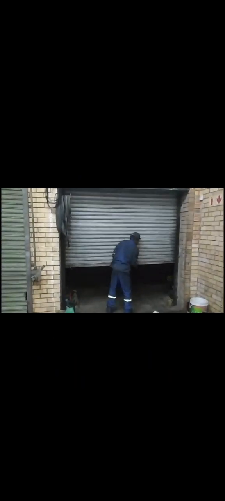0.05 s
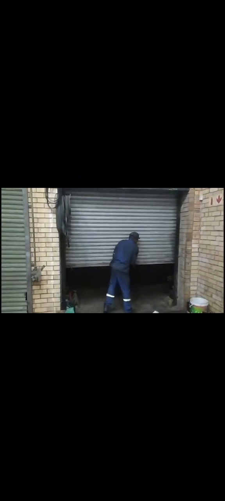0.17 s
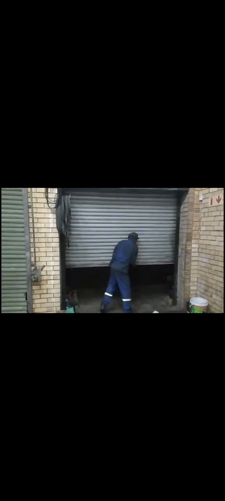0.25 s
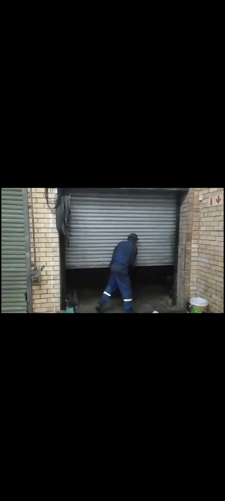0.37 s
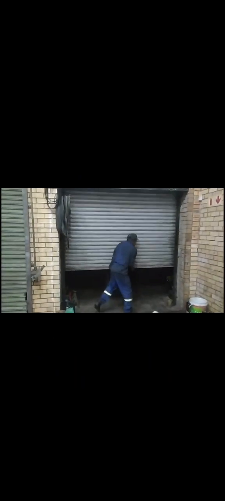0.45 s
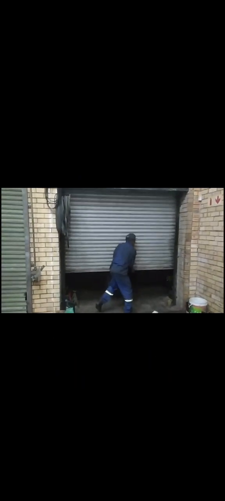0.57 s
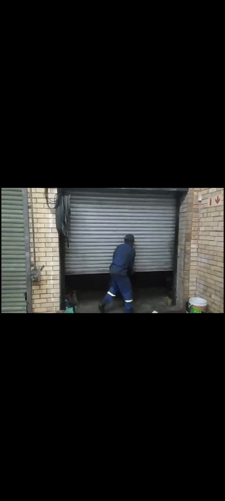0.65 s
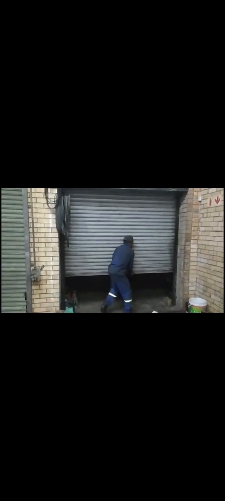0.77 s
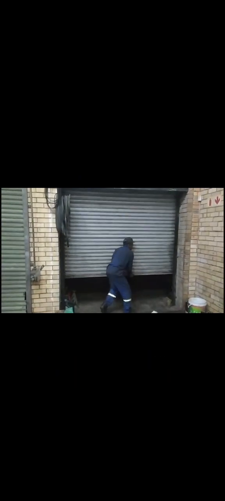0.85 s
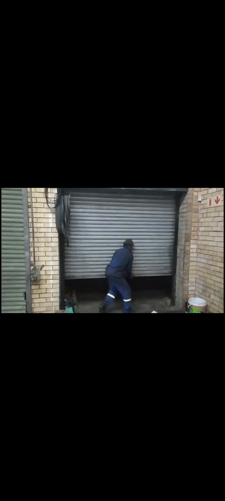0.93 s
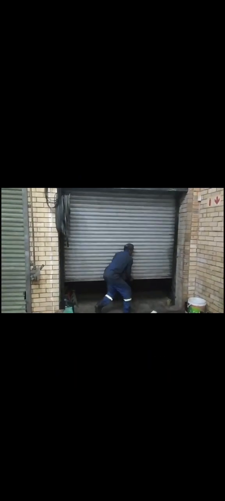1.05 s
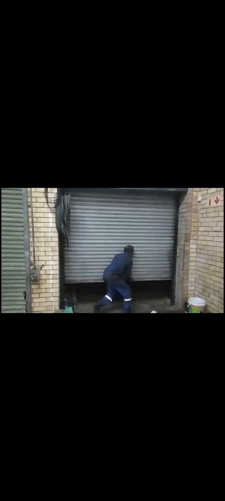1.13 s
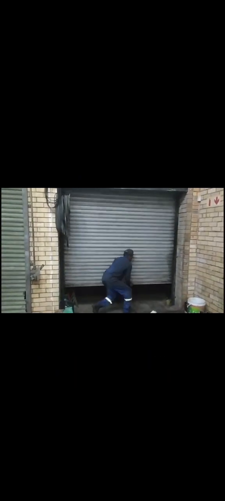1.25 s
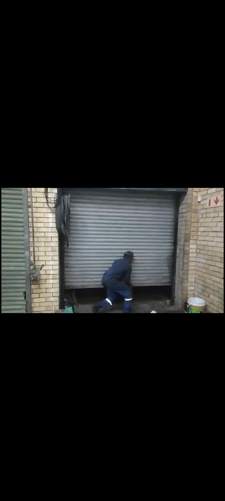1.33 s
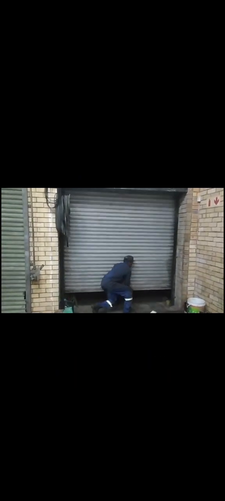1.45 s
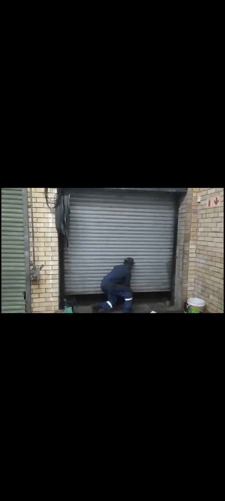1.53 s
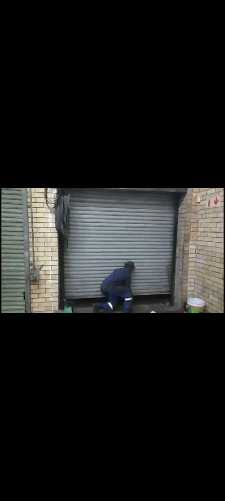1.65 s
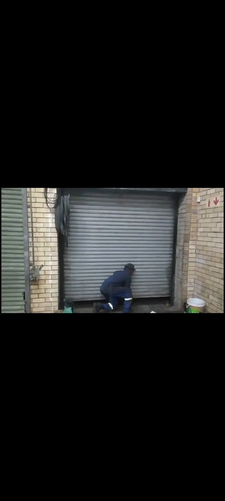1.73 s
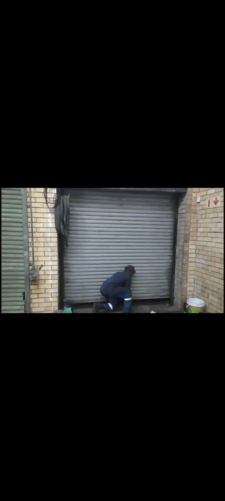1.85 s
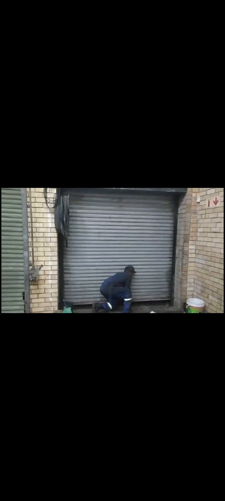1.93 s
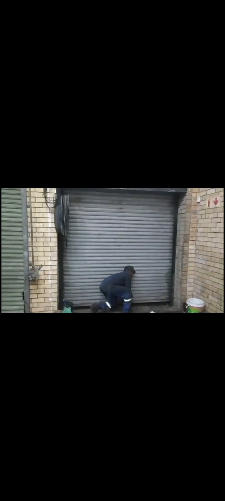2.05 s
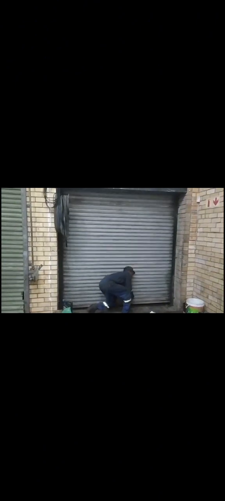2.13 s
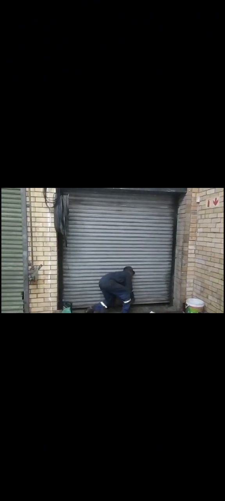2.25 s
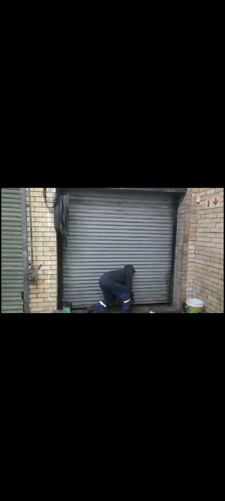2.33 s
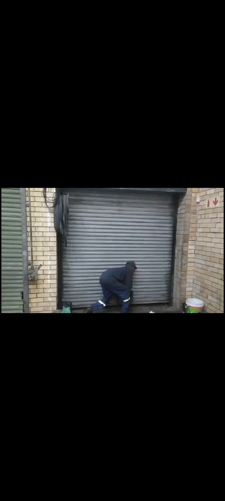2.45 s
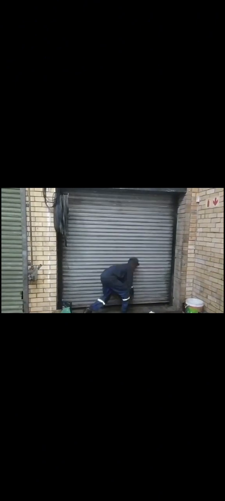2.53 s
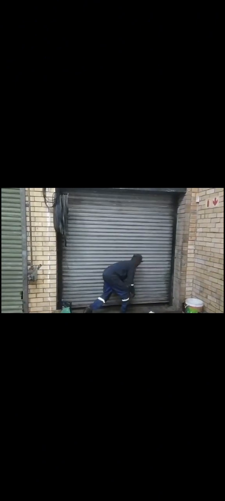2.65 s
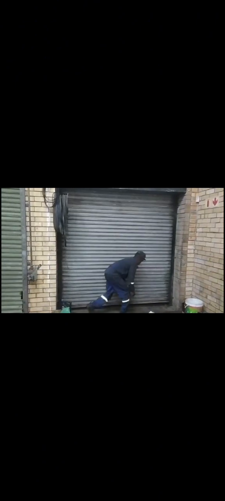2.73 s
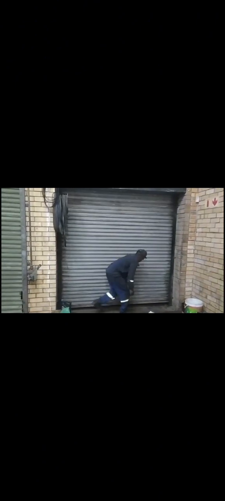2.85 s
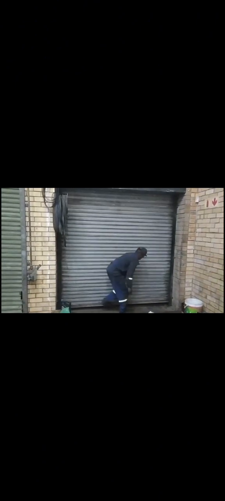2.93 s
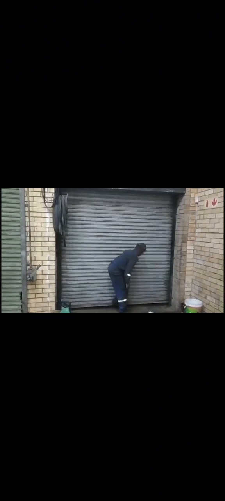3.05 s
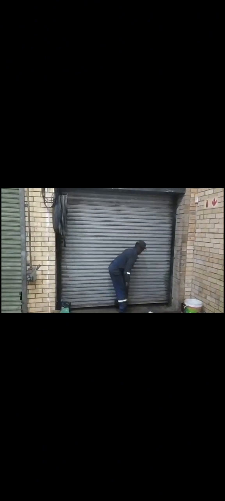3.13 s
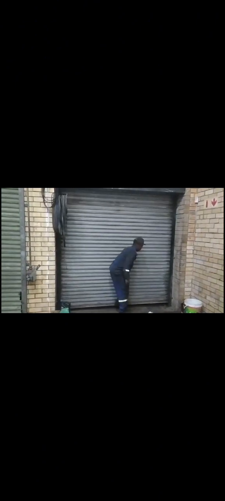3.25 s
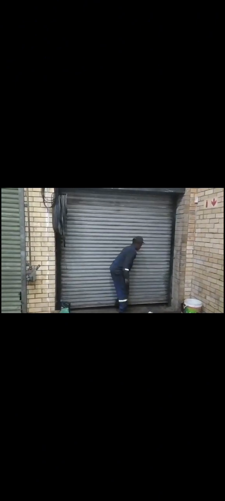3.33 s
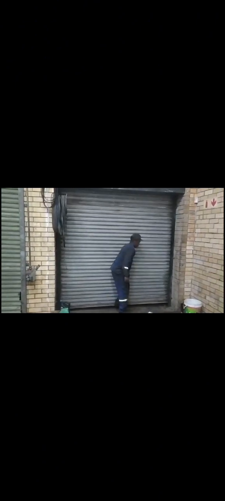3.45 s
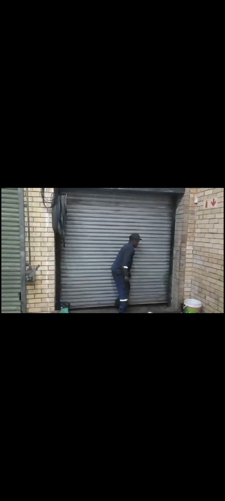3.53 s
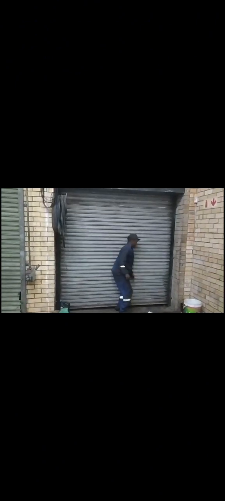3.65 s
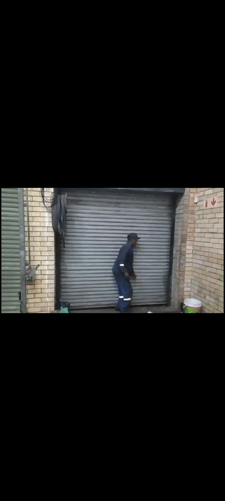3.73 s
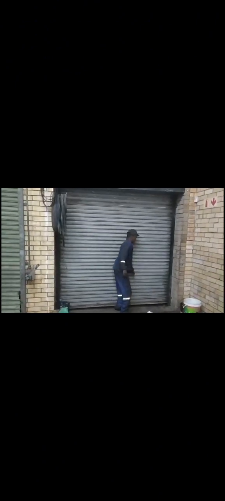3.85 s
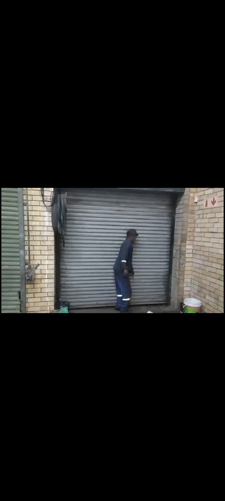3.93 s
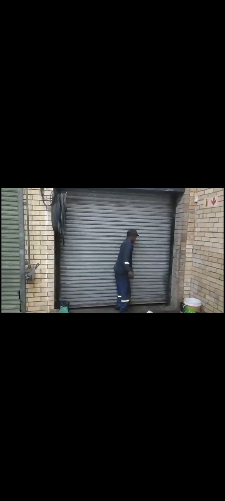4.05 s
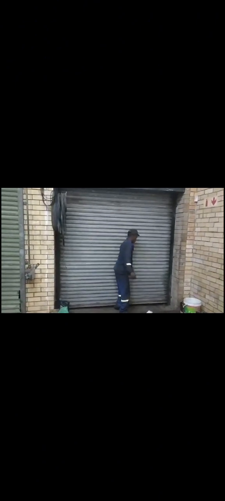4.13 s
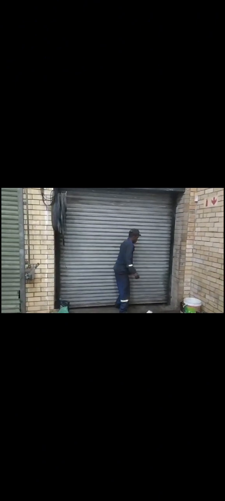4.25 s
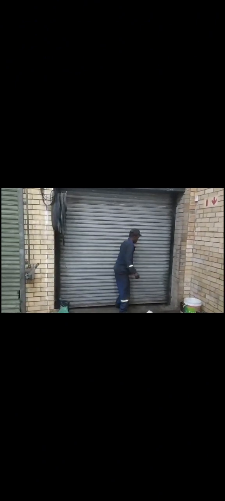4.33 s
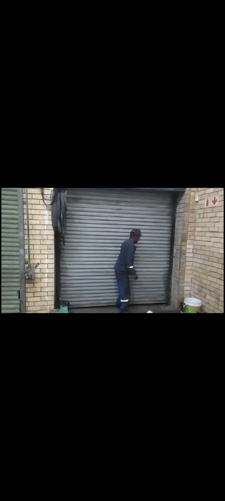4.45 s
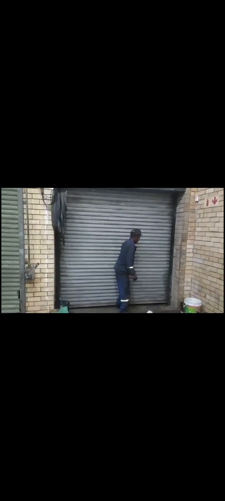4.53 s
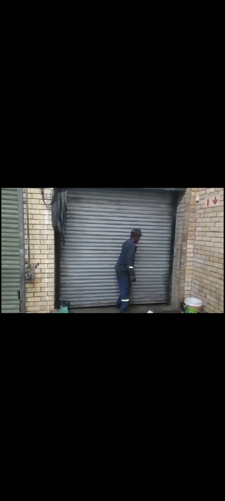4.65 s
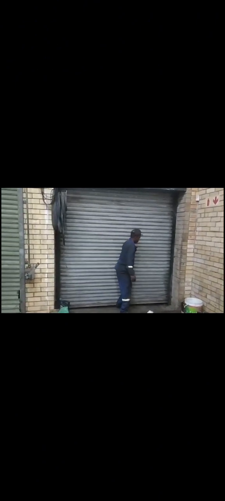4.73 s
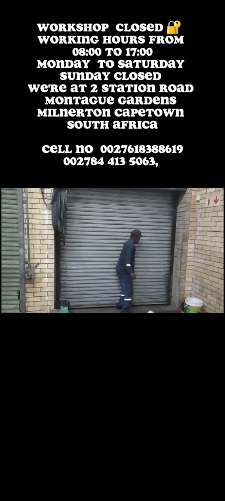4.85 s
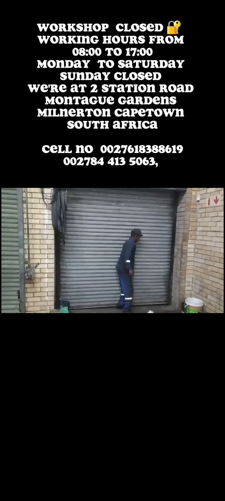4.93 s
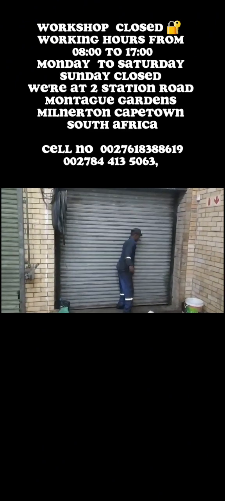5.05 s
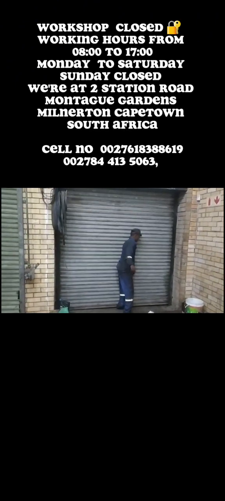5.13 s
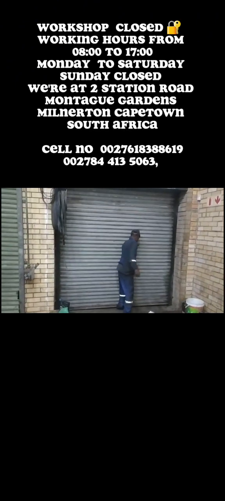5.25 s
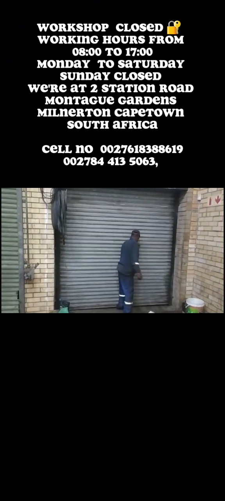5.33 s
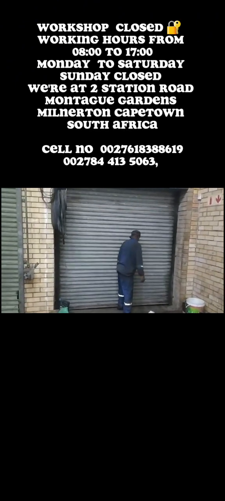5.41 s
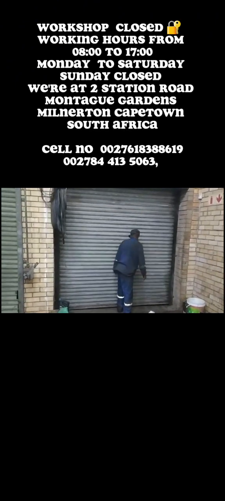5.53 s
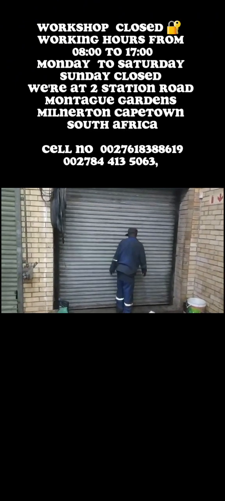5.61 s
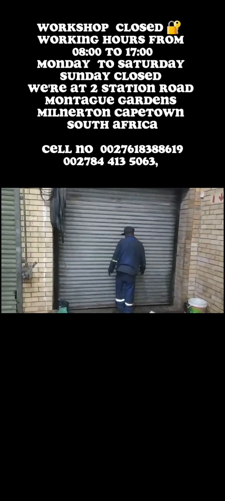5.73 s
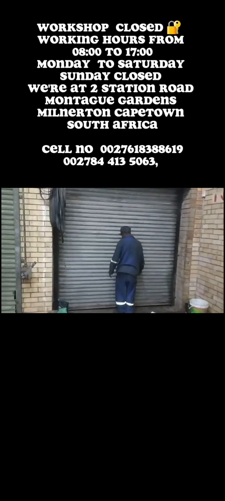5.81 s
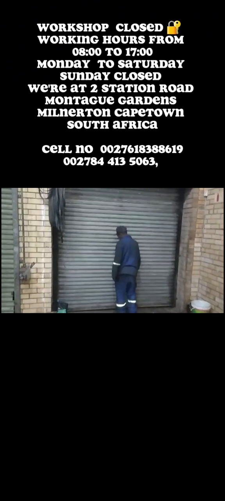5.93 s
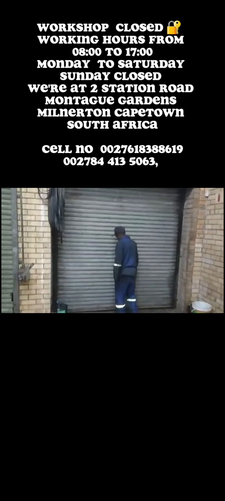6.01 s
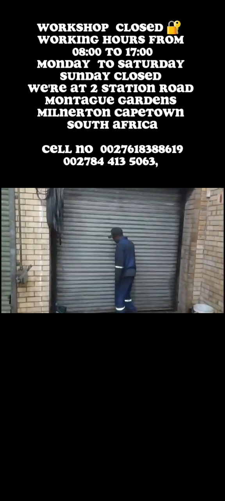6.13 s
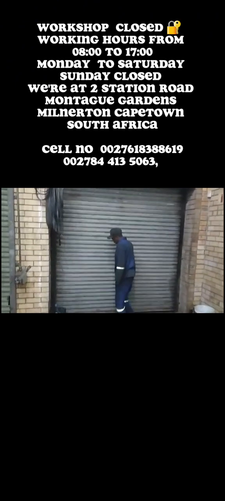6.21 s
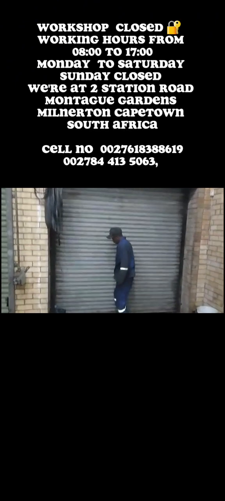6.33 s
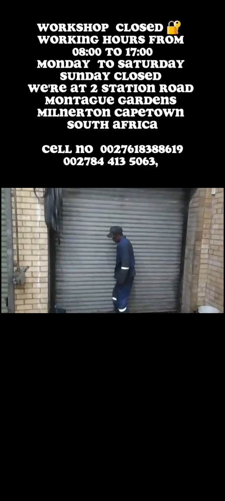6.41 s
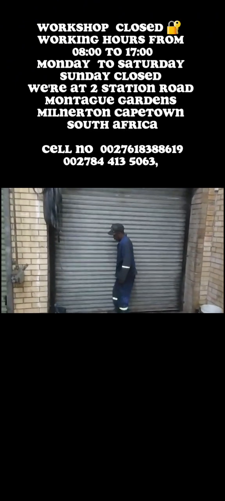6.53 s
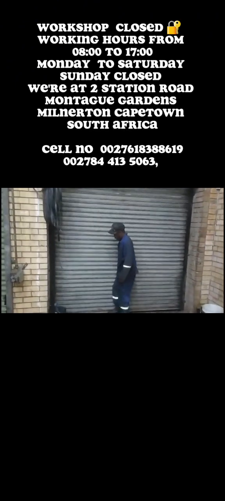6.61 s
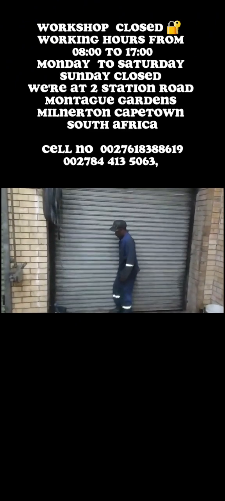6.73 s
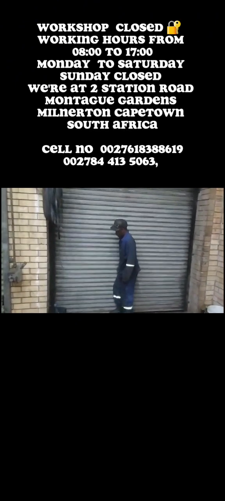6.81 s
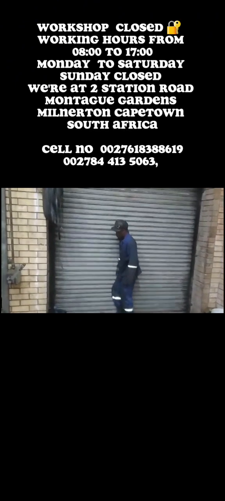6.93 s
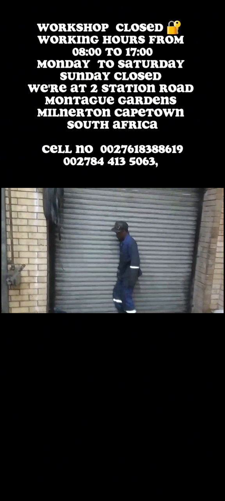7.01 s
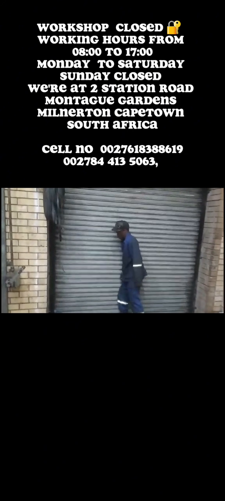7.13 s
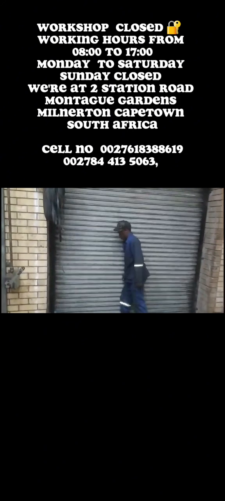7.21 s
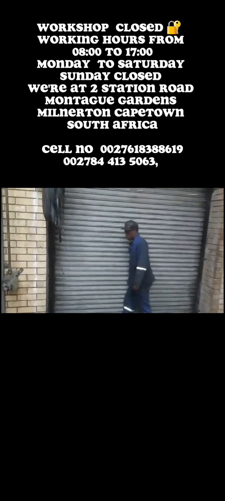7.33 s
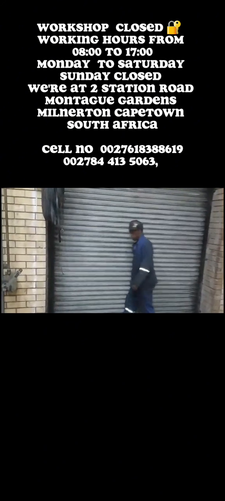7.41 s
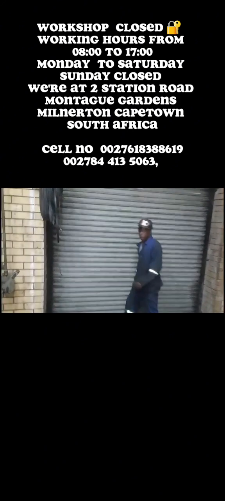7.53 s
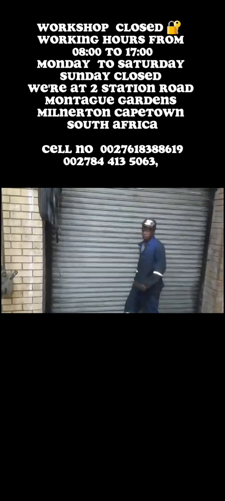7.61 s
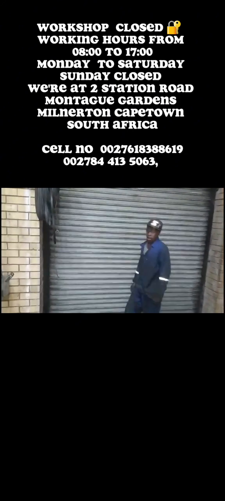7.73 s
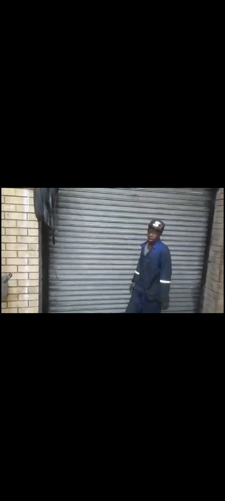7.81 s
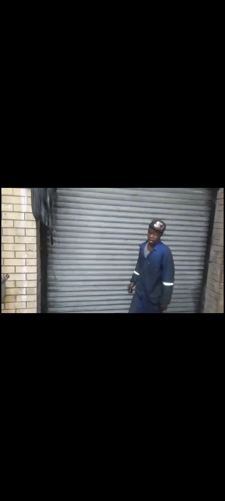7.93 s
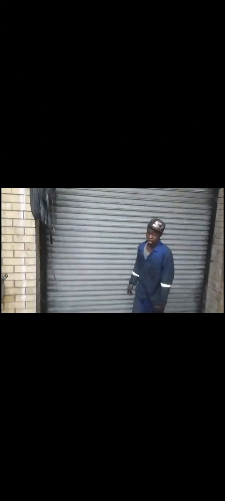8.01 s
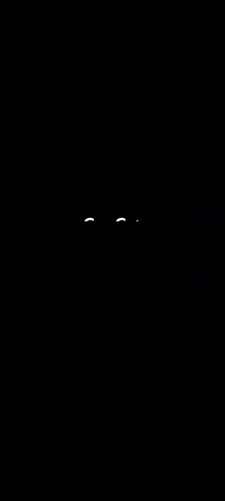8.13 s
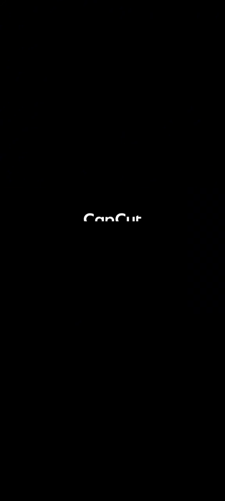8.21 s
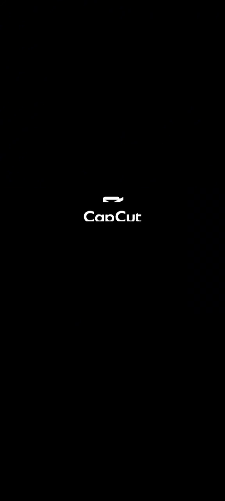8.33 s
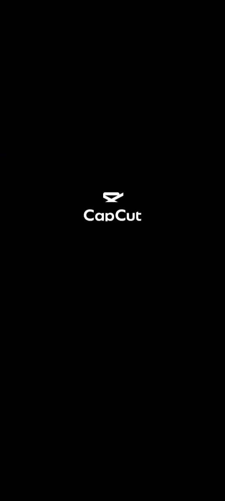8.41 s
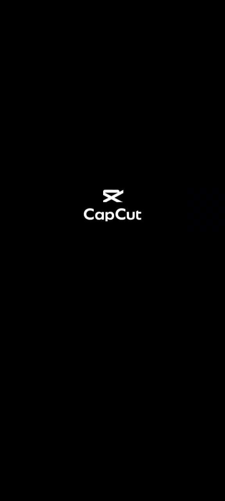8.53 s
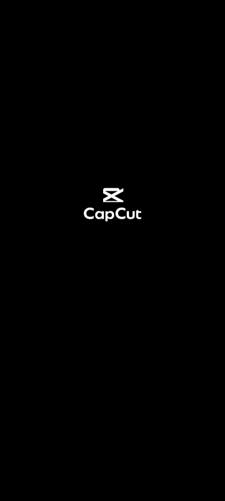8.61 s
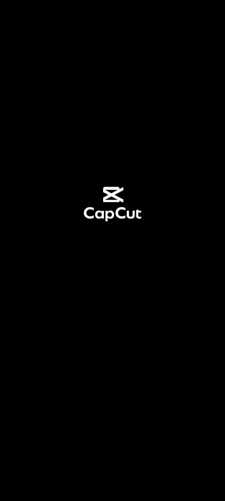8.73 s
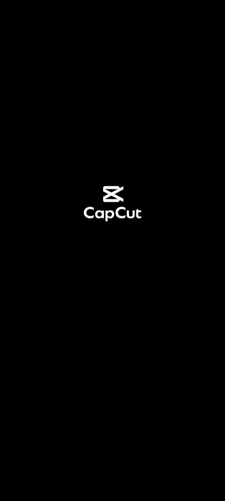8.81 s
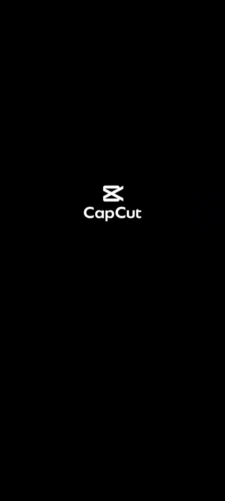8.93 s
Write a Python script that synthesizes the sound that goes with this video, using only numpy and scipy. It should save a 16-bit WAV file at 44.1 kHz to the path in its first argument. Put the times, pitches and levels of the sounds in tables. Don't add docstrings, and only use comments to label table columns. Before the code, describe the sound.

Noisy metal shutter pulled down with chattering slats and sheet booms, followed by spaced clanging blows, gritty scuffs and a sudden cut to silence.

```python
import sys
import numpy as np
from scipy import signal
from scipy.fft import rfft, irfft, next_fast_len
from scipy.io import wavfile
from scipy.ndimage import uniform_filter1d

SR = 44100
rng = np.random.default_rng(int(sys.argv[2]) if len(sys.argv) > 2 else 0)


def how_loud(loudness_db):
    steps = np.asarray(loudness_db, float) / 20
    return 10 ** steps


def to_wav(s):
    ch = np.atleast_2d(s).T
    pcm = np.round(np.clip(ch, -1, 1) * 32767)
    wavfile.write(sys.argv[1], SR, pcm.astype(np.int16))


N = 395131
SIZE = next_fast_len(N + SR)
HZ = np.arange(SIZE // 2 + 1) * SR / SIZE

# pitch in Hz, level in dB per Hz.
YARD_HUM = [(15, -34.5), (25, 0.5), (86, -14), (184, 1.5), (381, -16), (586, -6.5), (1770, -19),
            (1970, -31.5), (9420, -28), (15700, -48)]
# pitch in Hz, likeness from 0 to 1.
PORT_LIKENESS = [(60, 0.94), (130, 0.99), (290, 0.99), (640, 0.87), (1410, 0.21), (3100, 0), (6820, 0.03),
                 (15000, 0)]
# time in seconds, force in dB, brightness in dB.
PULL = [
    (0, -18.5, -3),
    (.2, -27, 1),
    (.24, -42, -14.5),
    (.5, -23, -6),
    (.6, -22.5, -1.5),
    (1.66, -18.5, 0),
    (1.76, -18.5, 0),
    (2.36, -18, -2),
    (2.46, -36, -5.5),
]
# pitch in Hz, level in dB per Hz.
CURTAIN_TONE = [(25, -15.5), (135, -14.5), (193, -15.5), (998, -6), (1500, -8), (2530, -5), (3200, -11.5),
                (4130, -15.5), (5230, -11.5), (6300, -11), (8810, -1.5), (10500, -11), (11600, -20),
                (15700, -33)]
# pitch in Hz, width in Hz, level in dB.
SHEET_MODES = [(258, 110, 3.5), (301.2, 4.9, 8), (353.8, 10, 8), (426, 11, 4), (588, 41, 0.5),
               (672.6, 21, 4), (810, 180, 0)]
PART_EDGES_HZ = [140, 480, 3200, 6400, 11000]
# t60 in seconds, level under the pull in dB, level after a blow in dB,
# share of the brightness from 0 to 1, level under a scuff in dB, level at rest in dB.
CURTAIN_PARTS = [
    (1.87, -8, -16, 0, -12.5, -55.5),
    (1.653, -0.86, -7, 0.2, -8.5, -54.5),
    (1.23, -5.5, -8.5, .7, -12, -67),
    (1.17, -2.5, -2.9, 0.9, -2.2, -68),
    (0.93, -22, -15.5, 1, -11.5, -72.5),
]
# start in seconds, peak in dB, pitch in Hz, thud in dB, hinge shake in dB.
RATTLE = [(.1932, -8.5, 5340, -27.5, -38.5), (.5639, -11.5, 8100, -19.5, -27),
          (.5897, -14, 5200, -28, -36.5), (.7379, -9, 7130, -18, -31.5), (.8873, -5, 7050, -15, -23.5),
          (.9052, -14.5, 7050, -20, -35.5), (1.0835, -3, 9140, -37, -26), (1.22, -15, 9160, -18.5, -38.5),
          (1.3887, -8.5, 7050, -20, -24), (1.549, -6.5, 5420, -14.5, -24), (1.699, -10.5, 7800, -12, -28.5),
          (1.7185, -9.5, 9400, -13.5, -32), (1.9, -15.5, 7700, -13.5, -30),
          (2.0538, -1.5, 8800, -21.5, -32), (2.1088, -11, 8550, -26.5, -26.5)]
# start in seconds, peak in dB, pitch in Hz, thud in dB, hinge shake in dB.
STAMPS = [(3.7870, -6.5, 8300, -13, -18), (3.8148, -6, 9200, -45.5, -32), (3.8292, -7, 9500, -24, -31.5),
          (3.9025, -5, 8760, -13.5, -25.5), (3.98, -16, 8880, -19, -30.5), (4.9723, -6, 8760, -16, -25),
          (4.9898, -8.5, 7950, -19.5, -24.5), (5.1105, -11, 8450, -14.5, -24.5),
          (5.169, -15.5, 8340, -22, -32.5), (5.29, -21.5, 8650, -20, -40.5),
          (7.109, -23, 8740, -15.5, -22.5), (7.1192, -7, 8650, -21.5, -27), (7.133, -3.5, 8940, -25, -27),
          (7.212, -5, 8800, -16, -26.5), (7.2367, -5, 5610, -18.5, -30), (7.2843, -8, 5600, -23, -26.5),
          (7.434, -16, 8700, -27.5, -31.5), (7.4592, -13.5, 5500, -24, -29.5),
          (7.55, -20, 8700, -36, -30.5), (7.66, -24, 8700, -42, -42)]
# start in seconds, peak in dB, pitch in Hz, thud in dB, hinge shake in dB.
SETTLING = [
    (3.1249, -30.5, 8980, -25, -45.5),
    (3.2104, -16.5, 8300, -22, -34.5),
    (3.6176, -33.5, 8920, -27.5, -50),
    (4.2, -30, 8580, -23, -41),
    (4.633, -35.5, 8750, -52, -76.5),
    (5.6213, -27.5, 8770, -33, -49),
    (5.987, -33, 8380, -50, -40.5),
    (6.548, -40.5, 9060, -34, -51),
    (7.073, -35, 8600, -33.5, -47.5),
    (7.8847, -28.5, 8480, -37, -51),
]
# start in seconds, length in seconds, level in dB.
SCUFFS = [
    (3.026, 0.22, -49),
    (3.74, 0.097, -36),
    (5.706, 0.41, -39.5),
    (6.302, 0.15, -51),
    (6.53, 0.63, -41.5),
]
# pitch in Hz, level in dB, t60 in seconds.
BAR_MODES = [(5230, -12.5, .6), (5090, -16.5, 0.32), (5180, 0.5, .7), (5420, -3.5, .8), (5420, -5, .7),
             (5430, 5, .8), (5610, -1.5, .9), (5700, 2.5, .8), (5500, -0.5, 0.46), (5940, -5, .6)]
# start in seconds, level in dB.
BAR_BLOWS = [(0.196, -32), (.59, -35.5), (1.549, -16), (3.801, -15.5), (3.903, -19), (3.98, -21),
             (7.123, -11.5), (7.169, -9), (7.231, -9.5), (7.285, -13.5), (7.315, -13), (7.42, -23),
             (7.52, -25), (7.63, -33)]
# start in seconds, peak in dB, pitch in Hz, t60 in seconds.
BOOMS = [
    (0.721, -23.5, 200, 0.6),
    (1.4, -16.5, 223, 0.51),
    (1.51, -15, 234, 0.68),
    (1.715, -11, 265, 0.57),
    (1.72, -13, 760, 0.36),
    (2.319, -20.5, 350, 0.95),
    (3.121, -32.5, 704, 0.26),
    (3.21, -25, 495, 0.24),
    (3.213, -23, 287, .7),
    (6.545, -29, 278, 0.84),
]
# start in seconds, peak in dB, pitch in Hz, t60 in seconds, left minus right in dB.
TICKS = [
    (3.0353, -27, 5660, .008, 1),
    (3.2125, -18, 2710, 0.055, -0.5),
    (4.961, -23.5, 8840, 0.024, 3),
    (4.9735, -6.5, 8500, 0.014, 0.5),
    (6.2105, -23, 5700, 0.0073, 4.5),
    (6.3314, -31, 4080, .008, 4.5),
    (6.346, -26.5, 3970, .012, 11),
    (6.4258, -26.5, 3430, .012, 7),
    (6.707, -21.5, 9300, 0.013, 10.5),
]
# pitch in Hz, left minus right in dB.
PORT_BALANCE = [(60, 4), (110, -2), (200, 0), (380, -0.5), (700, 0.5), (1290, 0), (2380, 8), (4400, -0.5),
                (8120, -4), (15000, 21.5)]
# pitch in Hz, share lost from 0 to 1.
BANDS_LOST = [(2900, 0), (3300, .22), (4500, .36), (5300, .2), (6500, .28), (7500, .04), (10000, .05),
              (11200, .22), (13000, .4), (14500, .65), (16000, .95)]
# start in seconds, end in seconds, lost above this pitch in Hz.
TOP_LOST = [(.19, .36, 11000), (.98, 1.055, 12200), (2.39, 2.5, 13000), (3.77, 3.83, 13600),
            (3.83, 3.89, 10730), (3.96, 4.0, 10800), (4.07, 4.15, 11600), (4.98, 5.12, 14000),
            (5.12, 5.3, 12800), (7.17, 7.45, 11670)]


def level(x, db):
    return x * how_loud(db) / np.sqrt(np.mean(x ** 2))


def over_hz(table):
    hz, value = np.transpose(table)
    return np.interp(np.log(HZ + 1), np.log(hz + 1), value)


def fade(t60, seconds):
    return how_loud(-60 * np.arange(int(seconds * SR)) / SR / max(t60, .002))


def walk(rate):
    k = int(SR / rate)
    held = np.repeat(rng.standard_normal(N // k + 1), k)
    return 1.7 * uniform_filter1d(uniform_filter1d(held, k), k)[:N]


def band(x, hz, width, times=1):
    edges = np.clip([hz - width / 2, hz + width / 2], 30, .45 * SR)
    b, a = signal.butter(1, edges, "band", fs=SR)
    for _ in range(times):
        x = signal.lfilter(b, a, x)
    return x


def add(out, s, sound, peak_db, pan_db):
    i = int(s * SR)
    sides = how_loud(peak_db + np.array([[pan_db], [-pan_db]]) / 2)
    out[:, i:i + sound.shape[-1]] += sound / np.abs(sound).max() * sides


def at_ports(count):
    mid, side = rfft(rng.standard_normal((2, count)), SIZE)
    like = np.clip(over_hz(PORT_LIKENESS), 0, 1)
    opposite = side * np.array([[1], [-1]])
    return (np.sqrt(1 + like) * mid + np.sqrt(1 - like) * opposite) / np.sqrt(2)


def yard():
    hum = irfft(at_ports(N) * how_loud(over_hz(YARD_HUM)), SIZE)[:, :N]
    return level(hum, -51.5) * how_loud(1.3 * walk(1.8))


def shiver(t60, pull_db, blow_db, bright, scuff_db, rest_db):
    shudder_s, shake_rise_s = 0.033, 0.026
    scuff_skew = 0.74
    damped_s, damped_db_per_s = 7.66, 10
    t = np.arange(N) / SR
    s, force_db, bright_db = np.transpose(PULL)
    pulled_db = np.interp(t, s, force_db + bright * bright_db) + pull_db
    feed = how_loud(2 * pulled_db) * (t < s[-1])
    keep = how_loud(-2 * 60 / t60 / SR)
    energy = signal.lfilter([1 - keep], [1, -keep], feed, zi=[feed[0]])[0] + how_loud(2 * rest_db)
    for at, _, _, thud_db, shake_db in RATTLE + STAMPS + SETTLING:
        span = slice(int(at * SR), int(at * SR) + 2 * SR)
        age = t[span] - at
        db = thud_db + bright * (shake_db - thud_db) + blow_db
        db = db - 60 * np.maximum(age - shudder_s, 0) / t60
        energy[span] += how_loud(2 * db) * np.clip(age / shake_rise_s, 0, 1) ** 2
    for at, length, db in SCUFFS:
        progress = np.clip((t - at) / length, 0, 1) ** scuff_skew
        energy += how_loud(2 * (db + scuff_db)) * np.sin(np.pi * progress) ** 2
    return 10 * np.log10(energy) - damped_db_per_s * np.maximum(t - damped_s, 0)


def curtain():
    knocks_per_s, knock_spread_db, knock_t60_s = 700, 2, 0.14
    chance = rng.random((2, N))
    strength = how_loud(-2 * knock_spread_db * np.log(chance[1] + 0.0013))
    knocks = (chance[0] < knocks_per_s / SR) * strength
    energy = np.abs(signal.fftconvolve(knocks, fade(knock_t60_s, 1 / 4) ** 2)[:N])
    hail = np.sqrt(0.63 + energy / energy.mean())

    sheet = sum(how_loud(2 * db) / (1 + (2 * (HZ - hz) / width) ** 2) for hz, width, db in SHEET_MODES)
    noise = irfft(at_ports(N), SIZE)[:, :N]
    steel = rfft(noise * hail, SIZE) * how_loud(over_hz(CURTAIN_TONE)) * np.sqrt(0.42 + sheet)

    above = [1 / (1 + (hz / (HZ + 1)) ** 16) for hz in PART_EDGES_HZ]
    shares = [low - high for low, high in zip([1, *above], [*above, 0])]
    drum_db, *upper_db = (shiver(*part) for part in CURTAIN_PARTS)
    parts_db = [0.56 * drum_db - 32, drum_db, *upper_db]
    flickers_db = [0.97, 0.56, 0.43, 0.4, 0.6, 4.1]
    out = 0
    for share, part_db, flicker_db in zip(shares, parts_db, flickers_db):
        part = irfft(steel * share, SIZE)[:, :N]
        db = part_db + flicker_db * walk(12)
        out = out + part / np.std(part.mean(axis=0)) * how_loud(db)
    return out


def clanks():
    t60_s, rise_s, pan_spread_db = 0.1, .016, 7
    out = np.zeros((2, N))
    rise = 1 - fade(rise_s, 1 / 3)
    for s, db, hz, thud_db, _ in RATTLE + STAMPS + SETTLING:
        noise = rng.standard_normal((3, 2, SR // 3))
        crack = band(noise[0], 7500, 7000, times=3) * fade(0.64 * t60_s, 1 / 3)
        slat = band(noise[1], hz, 0.13 * hz, times=2) * fade(t60_s, 1 / 3)
        thud = band(noise[2, 0], 480, 700) * fade(0.21, 1 / 3) * (1 - fade(0.026, 1 / 3))
        pan_db = pan_spread_db * noise[2, 1, 0]
        add(out, s, (level(crack, -2.5) + level(slat, 0)) * rise, db + 0.5, pan_db)
        add(out, s, thud, thud_db - 1.0, 0)
    return out


def lock_bar():
    out, t = np.zeros((2, N)), np.arange(SR * 4 // 5) / SR
    for s, db in BAR_BLOWS:
        ring = 0
        for hz, mode_db, t60 in 2 * BAR_MODES:
            chance = rng.standard_normal(4)
            strength = how_loud(mode_db + 3 * chance[0]) * fade(t60, 4 / 5)
            detuned_hz = hz * (1 + .016 * chance[1])
            phases = 3 * chance[2:, None]
            ring = ring + strength * np.sin(2 * np.pi * detuned_hz * t + phases)
        hiss = band(rng.standard_normal((2, len(t))), 5480, 1100, times=2) * fade(.65, 4 / 5)
        sound = level(ring, 0) + level(hiss, -2.04)
        add(out, s, sound * (1 - fade(.02, 4 / 5)), db, 3)
    return out


def wall_echoes(x, t60):
    tail = fade(t60, 1)
    echoes = irfft(at_ports(SR), SIZE)[:, :SR] * tail / np.sqrt(np.sum(tail ** 2))
    return signal.fftconvolve(x[None], echoes, axes=1)[:, :N]


def booms():
    out = np.zeros((2, N))
    rise = 1 - fade(0.013, 1)
    for s, db, hz, t60 in BOOMS:
        flex = band(rng.standard_normal(SR), hz, 0.8 * hz, times=2)
        add(out, s, flex * fade(t60, 1) * rise, db, 0)
    return out


def grit_ticks():
    out = np.zeros((2, N))
    for s, db, hz, t60, pan_db in TICKS:
        noise = rng.standard_normal((2, SR // 20)) * fade(t60, 1 / 20)
        click = band(noise, 7000, 9000, times=2)
        ring = band(noise, hz, .4 * hz, times=2)
        add(out, s, level(ring, 0) + level(click, -3), db, pan_db)
    return out


def scene():
    background = yard()
    shivering = curtain()
    blows = clanks() + lock_bar()
    echoes = how_loud(-9) * wall_echoes(blows.mean(axis=0), 0.89)
    return background + shivering + blows + echoes + booms() + grit_ticks()


def missing_bands(x):
    block, lead = 1024, 284
    padded = np.pad(x, [(0, 0), (lead, 0)])
    hz, s, z = signal.stft(padded, SR, "cosine", nperseg=2 * block, noverlap=block)
    bands = (np.log(hz + 1) / .032).astype(int)
    luck = uniform_filter1d(rng.standard_normal((bands.max() + 1, len(s))), size=2, axis=1)
    rank = np.argsort(np.argsort(luck, axis=1), axis=1) / len(s)
    keep = rank[bands] > np.interp(hz, *np.transpose(BANDS_LOST))[:, None]
    treble = np.sum(np.abs(z[:, hz > 3000]) ** 2, axis=(0, 1))
    keep[:, treble > 2.2 * np.roll(treble, 1)] = True
    for start, end, top_hz in TOP_LOST:
        keep[np.ix_(hz > top_hz, (s > start) & (s < end))] = False
    heard = signal.istft(z * keep, SR, "cosine", nperseg=2 * block, noverlap=block)[1]
    return heard[:, lead:lead + N]


def low_pass(x):
    return signal.sosfilt(signal.butter(12, 15880, fs=SR, output="sos"), x)


def record(dry):
    lag_s, stop_s = .00016, 8.066
    balance = how_loud(np.clip(over_hz(PORT_BALANCE), -8, 8) * np.array([[.5], [-.5]]))
    delay = np.exp(-2j * np.pi * HZ * np.array([[0], [lag_s]]))
    heard = irfft(rfft(dry, SIZE) * balance * delay, SIZE)[:, :N]
    heard = missing_bands(np.clip(heard, -1, 1))
    stop = np.clip((stop_s - np.arange(N) / SR) / 0.0011, 0, 1)
    return low_pass(np.clip(heard, -1, 1) * stop)


dry = scene()
out = record(dry)
to_wav(out)
```